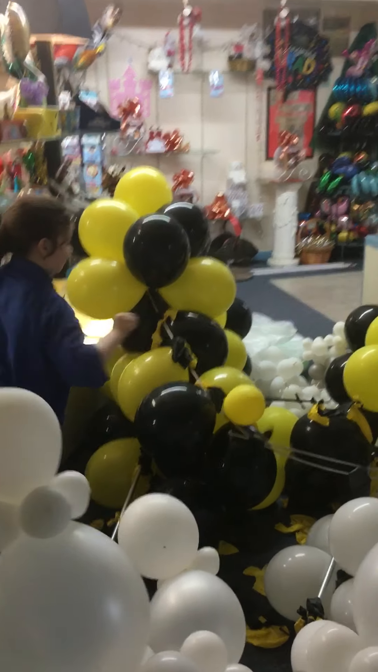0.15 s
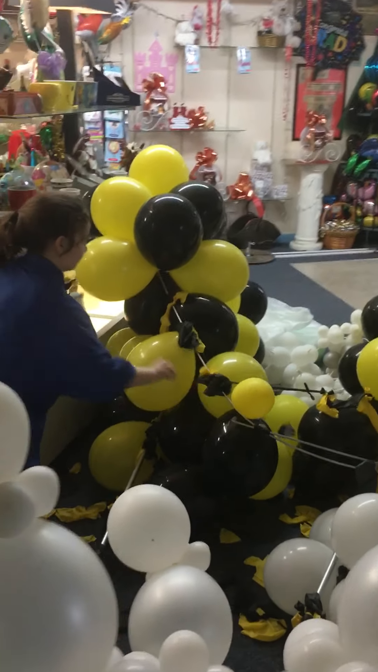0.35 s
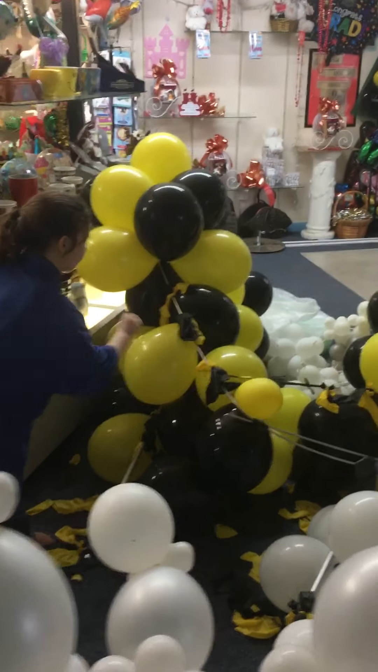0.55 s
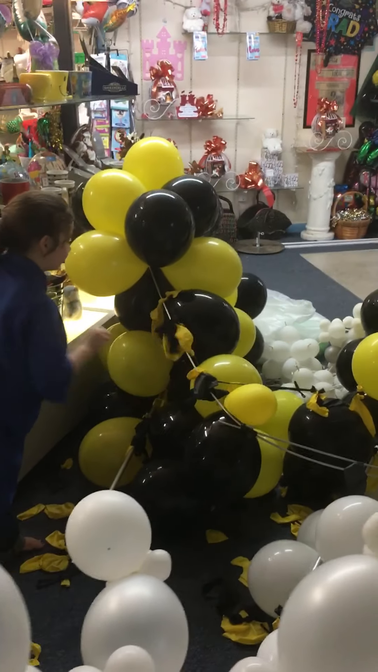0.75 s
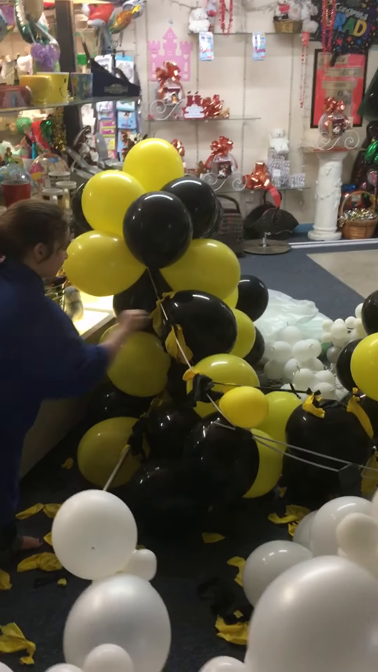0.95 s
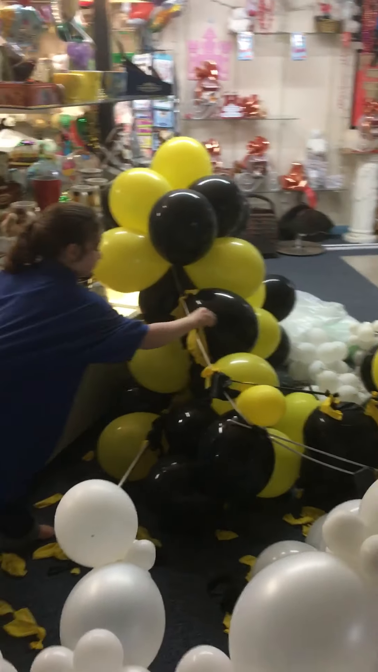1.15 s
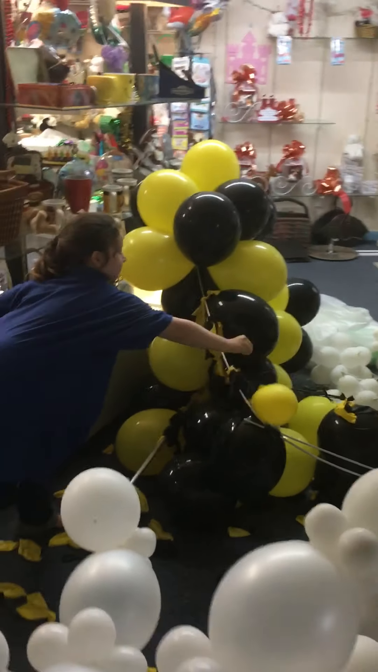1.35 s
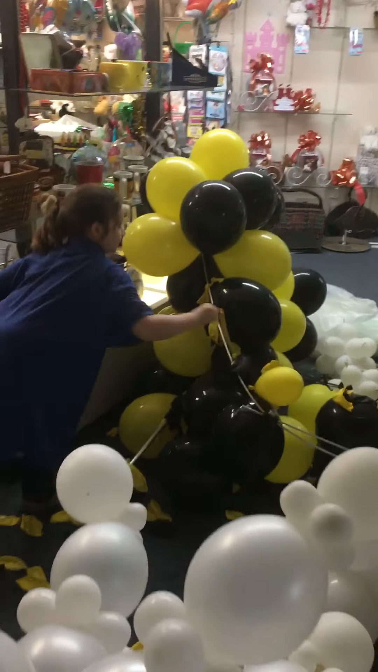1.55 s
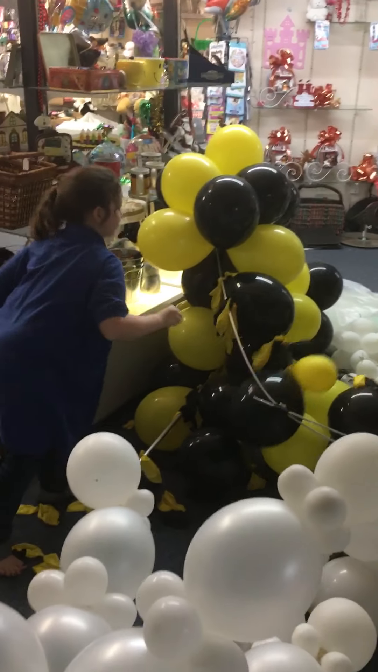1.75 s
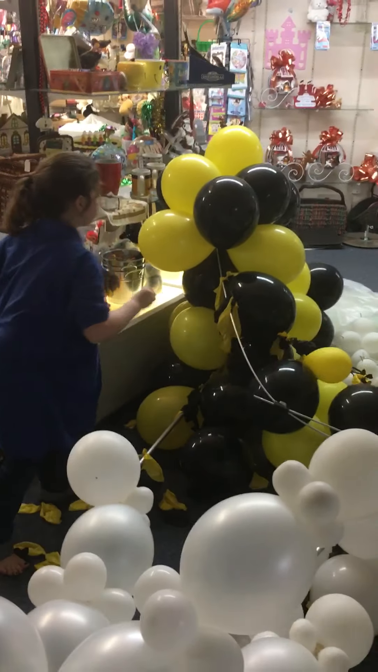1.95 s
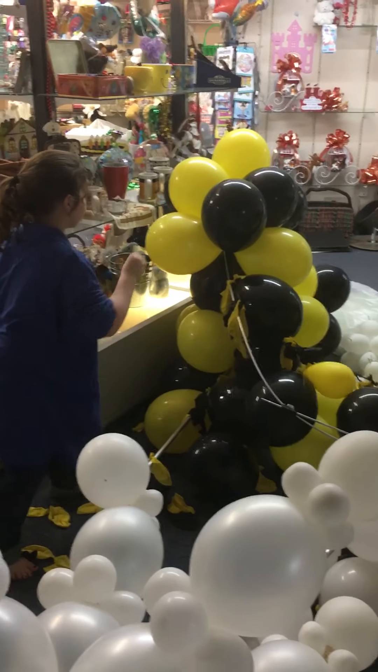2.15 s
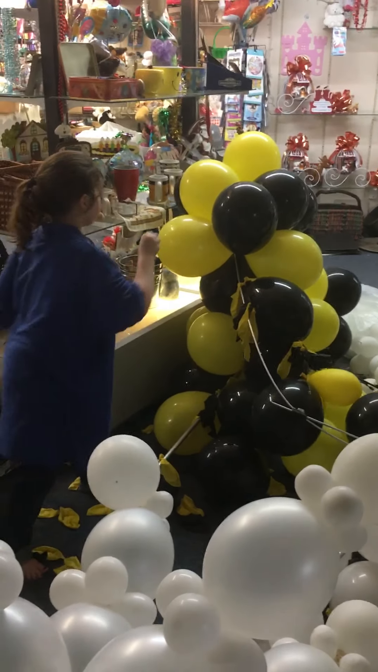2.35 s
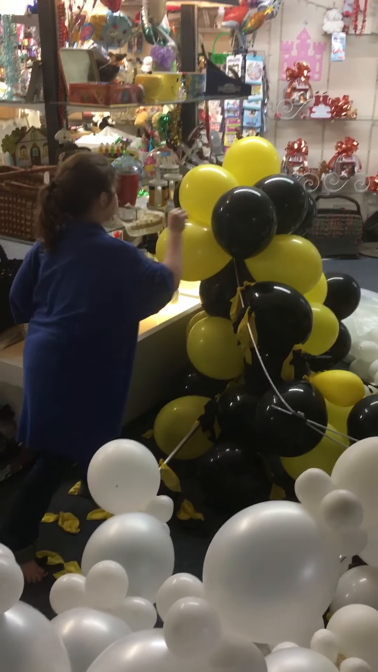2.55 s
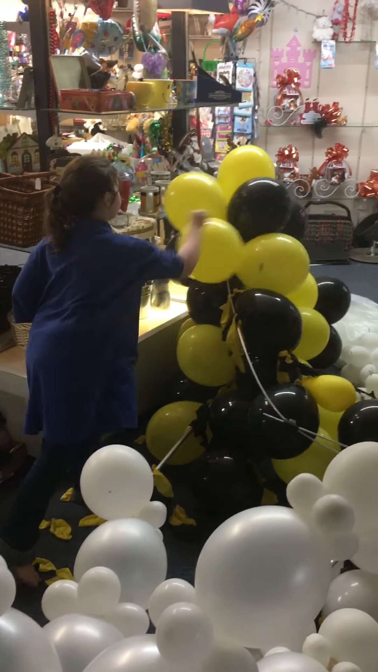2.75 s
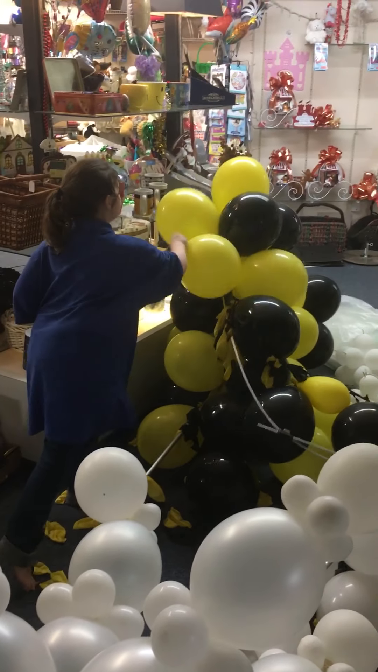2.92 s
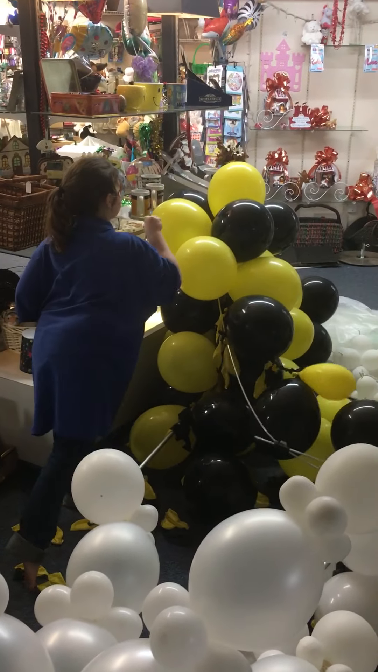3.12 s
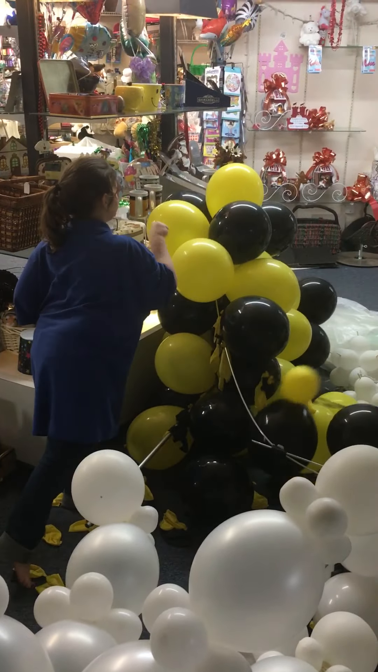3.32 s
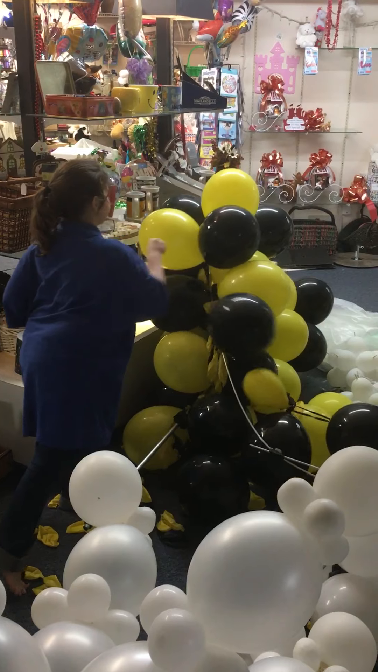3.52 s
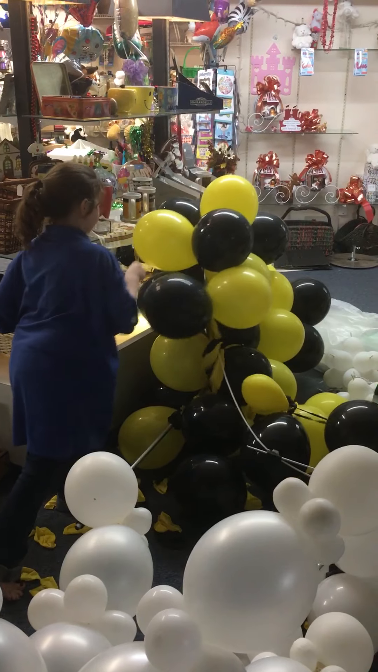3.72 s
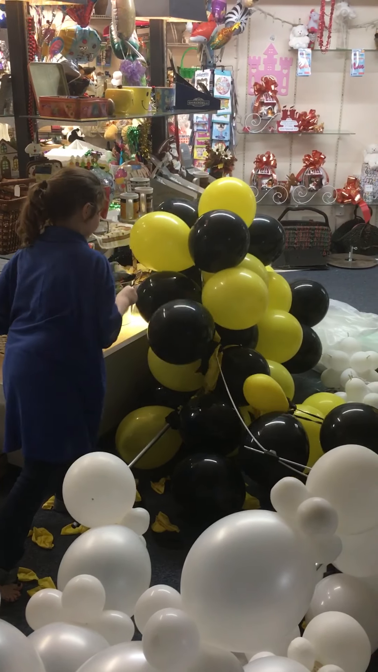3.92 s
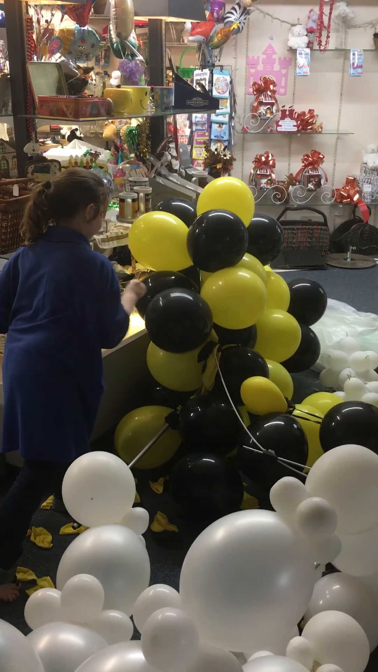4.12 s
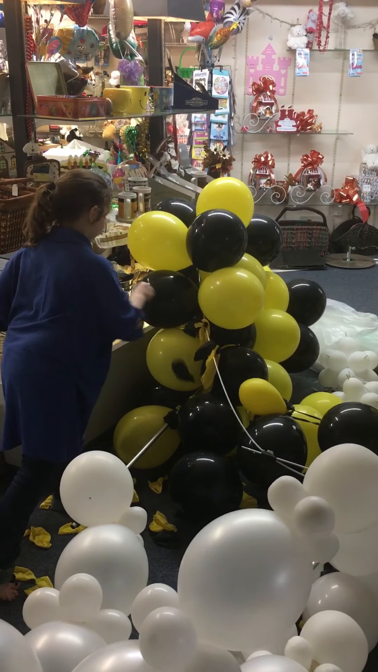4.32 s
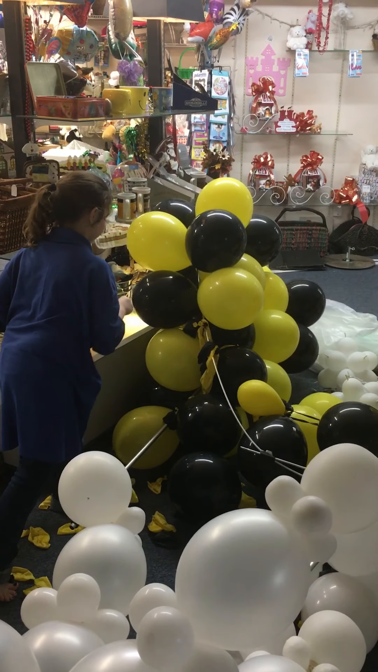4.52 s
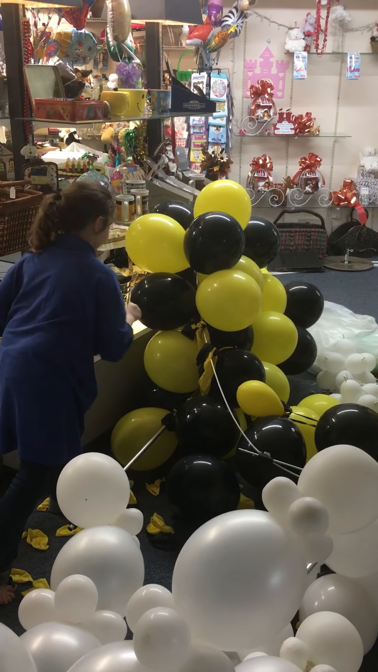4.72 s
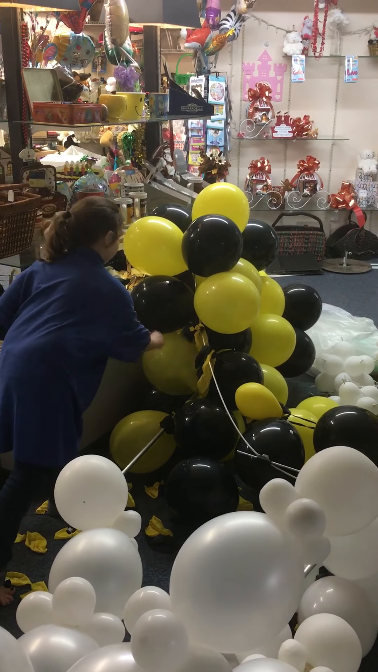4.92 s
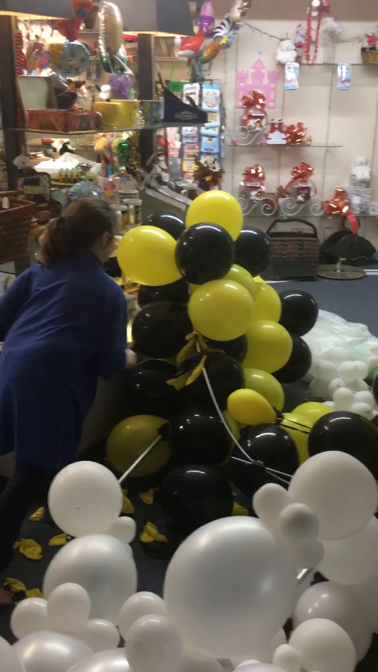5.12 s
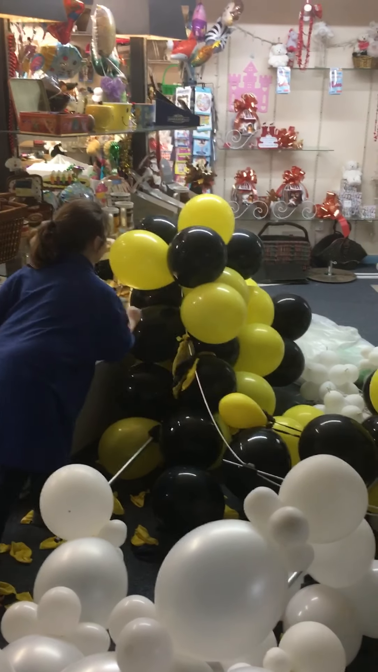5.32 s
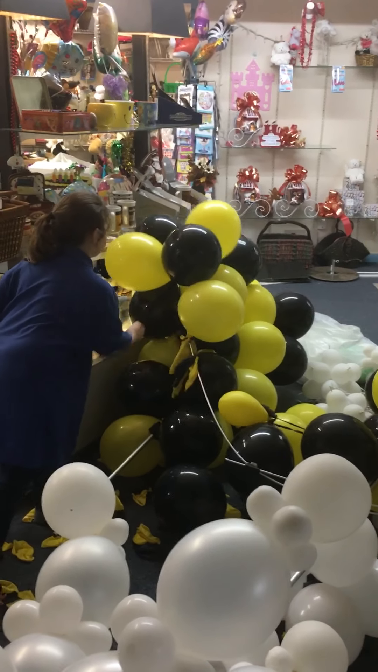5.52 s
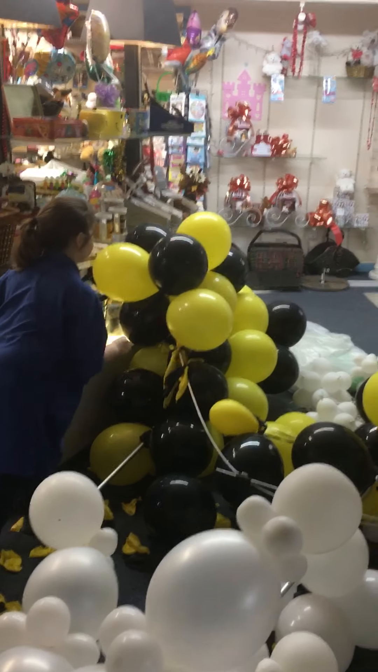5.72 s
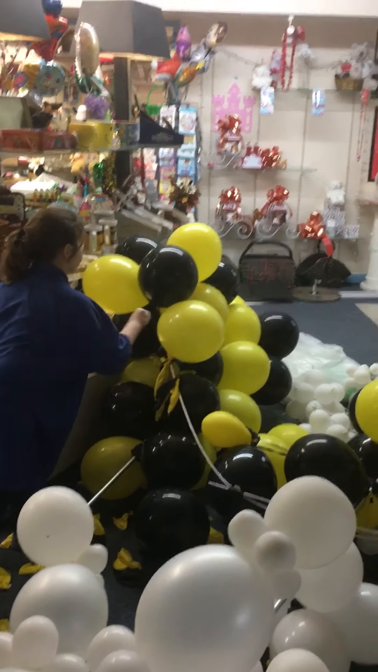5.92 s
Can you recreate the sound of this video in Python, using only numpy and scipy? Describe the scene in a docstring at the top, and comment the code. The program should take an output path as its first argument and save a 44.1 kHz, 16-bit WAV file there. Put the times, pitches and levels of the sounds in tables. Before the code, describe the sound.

Sharp balloon bangs dominate, starting immediately: three in rapid succession, a fourth after a short wait, a fifth after more than a second, then four more at roughly half to three-quarter second spacing. Every pop dies in a short, dense shop reverberation. Between them the remaining balloons sway, rub and bump very softly, with faint low room rumble and a dim sinking hum. Small microphone, slightly overloaded by the bangs.

```python
"""Small, crowded shop: nine balloons of a balloon column are pricked one after another.
Each pop is a whipping-skin noise burst, one N-shaped pressure swing, a floor bounce and a brief shop ring.
Between pops: noise swells for sway, rustle and rubs, noise ticks for snaps, decaying sines for knocks.
Underneath: steady noise rumble and two swells of a low sine drone, sinking in pitch."""
import sys
import numpy as np
from scipy import signal
from scipy.fft import rfft, irfft, next_fast_len
from scipy.io import wavfile
from scipy.ndimage import uniform_filter1d

SR = 44100
rng = np.random.default_rng(int(sys.argv[2]) if len(sys.argv) > 2 else 0)


def wav_record(signal):
    """Record a signal, one row per channel, as 16-bit PCM in the file named by sys.argv[1]."""
    frames = np.transpose(np.atleast_2d(signal))
    bounded = np.clip(frames, -1, 1)
    # unit amplitude maps onto the largest positive 16-bit level
    quanta = np.round(bounded * 32767).astype(np.int16)
    wavfile.write(sys.argv[1], SR, quanta)


N = 263144

HALF_SWING_S = 0.00049  # centre to peak of a burst

# Pops, one row per balloon: t/s, relative burst level/dB, floor bounce delay/s,
# relative ring level low/dB, mid/dB, high/dB (high also sets the skin),
# column sway level/dB, sway length/s, four resonances of the tearing balloon f/Hz
POP_EVENTS = [ (0.015, -5, 0.0033, -3, 1, 1, -54, 0.4, 258, 1222, 2000, 3360),
              (0.3231, -6, 0.0048, -4, 4.5, 1.5, -62, 0.38, 361.4, 570, 2360, 7080),
              (0.6464, -4.5, .0054, -3.5, 0.6, -1.5, -62.5, 0.43, 344, 637, 1594, 10380),
              (1.3496, -5.5, 0.0046, 0, -1, 1.2, -57.5, 1.3, 210, 945, 1142, 1840),
              (2.6891, -5, 0.0039, -5.5, 6.2, 3, -52.5, 0.91, 215, 316.3, 2170, 6520),
              (3.4349, -8, 0.0031, -2.5, 3.5, 1, -55.5, 0.44, 509, 742, 1190, 5530),
              (4.2212, -9.5, 0.0043, -2, 4, 2.5, -63, 0.24, 477.7, 1437, 2900, 4150),
              (4.9586, -6, 0.0038, -1, 1, 1, -58.5, 0.57, 207.5, 800, 1905, 5110),
              (5.427, -5.5, 0.0056, -2, 4.5, 0.7, -52, 0.22, 131, 582, 1052, 1457)]


def pops(burst_db=1, bounce_db=-12.0, bounce_spread=2.7, ring_db=-14, ring_delay_s=0.001,
         resonance_db=-2, resonance_q=11, loss_hz=30, size=40000):
    """Burst, duller floor bounce, skin and ringing shop, all coloured by the balloon's resonances."""
    out = np.zeros(N)
    lead_s = 0.014  # room for the noise rising ahead of the burst
    t = np.arange(size) / SR - lead_s
    for s, level_db, bounce_s, low_db, mid_db, high_db, _, _, *resonances_hz in POP_EVENTS:
        bang = from_db(level_db + burst_db) * swing(t, HALF_SWING_S)
        bang += from_db(bounce_db) * swing(t - bounce_s, HALF_SWING_S * bounce_spread)
        bang += from_db(high_db) * skin(t)
        ring = from_db(ring_db) * shop_ring((low_db, mid_db, high_db))
        add(bang, lead_s + ring_delay_s, ring + neighbours())
        for hz in resonances_hz:
            width_hz = loss_hz + hz / resonance_q
            bang = bang + from_db(resonance_db) * resonate(bang + 1e-18, hz, width_hz)
        add(out, s - lead_s, scatter(bang))
    return out


def swing(t, half_s):
    """One N-shaped pressure wave of height 1, centred on t = 0."""
    u = t / half_s
    return u * np.exp(0.5 - u * u / 2)


# Whipping rubber skin, also used by snaps(): f/Hz, relative level/dB per Hz
SKIN_SPECTRUM = [(300, -2), (650, 3), (950, -3), (1400, 5.5), (2400, -7.5), (3200, -8), (4500, -24.5),
                 (6000, -22), (7700, -10), (10500, -6.5), (16000, -20)]


def skin(t, whip_db=-12.5, rise_s=0.0004, fall_s=0.0053, early_s=0.0012):
    """A faint rise of noise, then the sharp noise burst of the whipping rubber."""
    before_s = np.maximum(-t - early_s, 0)
    after_s = np.maximum(t + early_s, 0)
    rise = from_db(-19) * np.exp(-before_s / 0.005) * (before_s > 0)
    whip = np.exp(-before_s / rise_s - after_s / fall_s)
    return from_db(whip_db) * (rise + whip) * coloured(SKIN_SPECTRUM, len(t))


# Shop ring spectrum: f/Hz, relative level/dB per Hz
RING_SPECTRUM = [(62, -18.5), (88, -6.5), (125, -5.5), (170, 2), (330, 2.5), (600, -7), (900, -15),
                 (1550, -11.5), (2400, -20), (3100, -20), (4400, -33), (5500, -26.5), (7000, -32.5),
                 (10000, -23), (15000, -29)]
# Shop ring decay: f/Hz, t60/s
RING_DECAY = [(70, .5), (200, 0.28), (600, 0.26), (1600, 0.26), (4000, .24), (10000, .22), (15000, 0.16)]


def shop_ring(colour_db, build_s=0.0043, size=30000):
    """Dense reflections off shelves and walls build up, then each band dies at its own rate."""
    t = np.arange(size) / SR
    hz = np.fft.rfftfreq(size, 1 / SR) + 1
    colour = list(zip((300, 1500, 8000), colour_db))
    field = rfft(coloured(RING_SPECTRUM, size)) * from_db(at_hz(colour, hz))
    centres_hz, t60s = np.transpose(RING_DECAY)
    ring = np.zeros(size)
    for band, t60 in zip(np.eye(len(centres_hz)), t60s):
        share = np.interp(np.log(hz), np.log(centres_hz), band)  # overlapping bands sum to 1
        ring += irfft(field * share, size) * from_db(-60 * t / t60)
    return ring * (1 - np.exp(-t / build_s))


# Sympathetic ring of the balloons still standing: f/Hz, width per filter pass/Hz, level/dB, t60/s
NEIGHBOUR_MODES = [(90, 43, -39.5, 0.23), (450, 1500, -46.5, 0.17), (1590, 470, -55, 0.81),
                   (2840, 470, -54.5, 0.42)]


def neighbours(size=30000):
    """Clusters of close modes in the balloons all round, as decaying narrow-band noise."""
    t = np.arange(size) / SR
    out = np.zeros(size)
    for hz, width_hz, level_db, t60 in NEIGHBOUR_MODES:
        cluster = resonate(rng.standard_normal(size), hz, width_hz)
        cluster = resonate(cluster, hz, width_hz)
        out += from_db(level_db) * rms_one(cluster) * np.exp(-np.log(1000) * t / t60)
    return out


def scatter(bang, echo_db=-11.5, reach_s=0.016, low_hz=800, count=10):
    """Balloons nearby throw back the treble: echoes, weaker with distance, that comb the sound."""
    treble = signal.sosfilt(signal.butter(1, low_hz, "high", fs=SR, output="sos"), bang)
    out = bang.copy()
    for k, (jitter, side) in enumerate(rng.random((count, 2))):
        place = (k + 1 + jitter) / (count + 1)
        sign = np.sign(side - 0.5)
        strength = from_db(echo_db) * sign * 2 * (1 - place / 2) ** 2 / np.sqrt(count)
        lag = int(place * reach_s * SR) + 1
        out[lag:] += strength * treble[:-lag]
    return out


# Sharp rubber snaps: t/s, relative level/dB
SNAP_EVENTS = [(.2188, -54), (1.3228, -35), (1.708, -57)]


def snaps(fall_s=0.001, room_db=-7, room_s=0.027, size=8000):
    """Taut rubber gives way with a tick that the shop carries on."""
    out = np.zeros(N)
    t = np.arange(size) / SR
    decay = np.exp(-t / fall_s) + from_db(room_db) * np.exp(-t / room_s)
    for s, level_db in SNAP_EVENTS:
        add(out, s, from_db(level_db) * decay * coloured(SKIN_SPECTRUM, size))
    return out


# Balloons knocking together: t/s, level/dB, f/Hz, t60/s
KNOCK_EVENTS = [(4.631, -52.5, 141.2, 0.13), (5.145, -32, 390, 0.058), (5.278, -47, 307, 0.11),
                (5.755, -57, 918, 0.23)]


def knocks(contact_s=0.002, size=12000):
    """A soft bump sets the air in a balloon ringing: one decaying sine."""
    out = np.zeros(N)
    t = np.arange(size) / SR
    for s, level_db, hz, t60 in KNOCK_EVENTS:
        decay = np.exp(-np.log(1000) * t / t60) * (1 - np.exp(-t / contact_s))
        add(out, s, from_db(level_db) * decay * np.sin(2 * np.pi * hz * t))
    return out


# Short rubs of skin on skin: t/s, level/dB, centre to 1/e length/s
RUB_EVENTS = [(1.09, -73, 0.026), (1.275, -71, 0.042), (1.94, -63.5, 0.038), (3.14, -65.5, .03),
              (3.271, -59, 0.021), (3.845, -61, 0.014), (4.07, -69.5, 0.035), (4.198, -54.5, 0.017),
              (5.243, -57, 0.024), (5.652, -55.5, 0.039), (5.78, -63, 0.049)]


def rubs():
    """Skins slide past each other in short soft scuffs of noise."""
    spectrum = [(300, 10.0), (1600, 4.0), (3200, -1), (4500, -15.5), (10000, -17.0), (15000, -26.5)]
    return swells(RUB_EVENTS) * coloured(spectrum, N)


SWAY_ATTACK_S, SWAY_SAG_DB_PER_S, SETTLE_DB_PER_S = 0.042, 8.5, 62
RUSTLE_DB = -17  # re shuffle, during sway

# Dull shuffle: f/Hz, relative level/dB per Hz
SHUFFLE_SPECTRUM = [(90, 0.5), (160, -0.5), (250, -1), (600, -6.5), (900, -12.5), (1500, -15),
                    (3000, -23.5), (4400, -35.5), (6000, -35.5)]
# Rubber rustle: f/Hz, relative level/dB per Hz
RUSTLE_SPECTRUM = [(3500, -13), (4500, -14), (6000, -6), (7300, -9), (9800, -1), (12500, -8.5),
                   (15000, -8.5)]
# Scraps and ribbons slithering down the column: t/s, level/dB, centre to 1/e length/s
SLITHER_EVENTS = [(1.08, -79.5, 0.042), (1.28, -77, .08), (2.2, -82.5, .1), (2.99, -67.5, 0.083),
                  (3.77, -76.5, 0.059), (4.53, -84, 0.043), (4.8, -86.5, .06)]


def column(lump_db=0.5, grain_db=1.0):
    """Jolted by each pop, the column shuffles dully; rubber scraps and ribbons rustle in small grains."""
    sway = np.zeros(N)
    for s, _, _, _, _, _, sway_db, length_s, *_ in POP_EVENTS:
        shape = envelope(s, length_s, SWAY_ATTACK_S, SWAY_SAG_DB_PER_S, SETTLE_DB_PER_S)
        sway += from_db(sway_db) * shape
    contact = wander(order=220)
    shuffle = rms_one(from_db(lump_db * contact) * coloured(SHUFFLE_SPECTRUM, N))
    rustle = rms_one(from_db(grain_db * contact) * coloured(RUSTLE_SPECTRUM, N))
    rustle_level = from_db(RUSTLE_DB) * sway + swells(SLITHER_EVENTS)
    return sway * shuffle + rustle_level * rustle


DRONE_ATTACK_S, DRONE_FADE_DB_PER_S, DRONE_RELEASE_DB_PER_S = 0.03, 20.5, 111
DRONE_SAG_HZ_PER_S = 42

# Room rumble and hiss: f/Hz, relative level/dB per Hz
RUMBLE_SPECTRUM = [(30, -13.5), (50, -6), (72, 0.5), (105, -12), (160, -7.5), (250, -19), (450, -28),
                   (1500, -33.5), (3000, -38.5), (4500, -50.5), (10000, -48), (16000, -55.5)]
# Low drone swells: start t/s, length/s, level/dB, starting f/Hz
DRONE_EVENTS = [(1.94, .6, -53, 172), (5.8, 0.072, -54, 154.7)]


def room_tone(rumble_db=-62, waver=0.35, wobble_hz=3):
    """Steady rumble and faint hiss, with a wavering low drone that sinks in pitch as it fades."""
    t = np.arange(N) / SR
    out = from_db(rumble_db) * coloured(RUMBLE_SPECTRUM, N)
    for s, length_s, level_db, start_hz in DRONE_EVENTS:
        hz = start_hz - DRONE_SAG_HZ_PER_S * (t - s) + wobble_hz * wander(order=3000)
        shape = envelope(s, length_s, DRONE_ATTACK_S, DRONE_FADE_DB_PER_S, DRONE_RELEASE_DB_PER_S)
        level = from_db(level_db) * shape * (1 + waver * wander(order=3000))
        out += level * np.sin(2 * np.pi * np.cumsum(hz) / SR)
    return out


def from_db(db):
    """Decibels to gain."""
    return 10 ** (np.asarray(db) / 20)


def rms_one(x):
    """Scale to unit rms."""
    return x / np.sqrt(np.mean(x ** 2) + 1e-20)


def at_hz(points, hz):
    """Read a table on a log-frequency axis."""
    f, value = np.transpose(points)
    return np.interp(np.log(hz), np.log(f), value)


def add(out, s, sound):
    """Mix a sound in from time s on."""
    i = max(int(round(s * SR)), 0)
    out[i:i + len(sound)] += sound[:N - i]


def coloured(spectrum, size):
    """Noise of rms 1 with the given spectrum, falling away beyond its ends."""
    fft_size = next_fast_len(size)
    hz = np.fft.rfftfreq(fft_size, 1 / SR) + 1
    low_skirt = 1 + (spectrum[0][0] / hz) ** 4
    high_skirt = 1 + (hz / spectrum[-1][0] / 2) ** 4
    gain = from_db(at_hz(spectrum, hz)) / np.sqrt(low_skirt * high_skirt)
    white = rfft(rng.standard_normal(fft_size))
    return rms_one(irfft(white * gain, fft_size)[:size])


def resonate(x, hz, width_hz):
    """Two-pole resonance with gain 1 on top."""
    r = np.exp(-np.pi * width_hz / SR)
    b = np.array([1, 0, -1]) * (1 - r * r) / 2
    a = [1, -2 * r * np.cos(2 * np.pi * hz / SR), r * r]
    return signal.lfilter(b, a, x)


def envelope(start_s, hold_s, attack_s, sag_db_per_s, release_db_per_s):
    """Attack, a slowly sagging hold, then a faster release."""
    t = np.maximum(np.arange(N) / SR - start_s, 0)
    loss_db = sag_db_per_s * t + release_db_per_s * np.maximum(t - hold_s, 0)
    return (1 - np.exp(-t / attack_s)) * from_db(-loss_db)


def swells(rows):
    """A bell-shaped rise and fall for each row: t/s, level/dB, centre to 1/e length/s."""
    t = np.arange(N) / SR
    return sum(from_db(level_db) * np.exp(-((t - s) / length_s) ** 2) for s, level_db, length_s in rows)


def wander(order):
    """Random drift of rms 1: noise averaged over `order` samples."""
    return rms_one(uniform_filter1d(rng.standard_normal(N), order))


def scene():
    """Everything at one microphone."""
    return (pops() + snaps() + knocks() + rubs() + column() + room_tone())[None]


def record(dry, low_cut_hz=66, cutoff_hz=15750):
    """The small microphone drops the deep bass; peaks are rounded off at full scale; the top is cut."""
    thin = signal.sosfilt(signal.butter(3, low_cut_hz, "high", fs=SR, output="sos"), dry)
    rounded = thin / (1 + thin ** 6) ** (1 / 6)
    return signal.sosfilt(signal.ellip(12, 0.1, 110, cutoff_hz, fs=SR, output="sos"), rounded)


dry = scene()
out = record(dry)
wav_record(out)
```